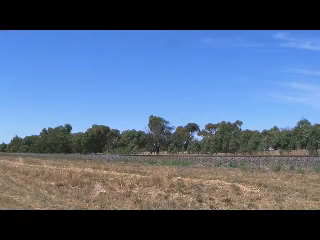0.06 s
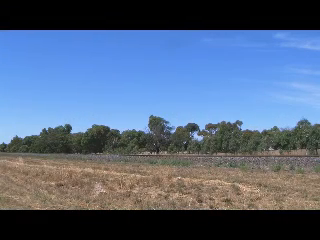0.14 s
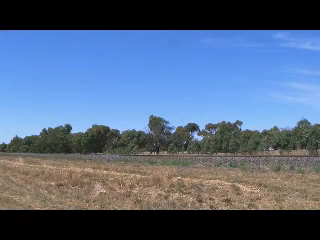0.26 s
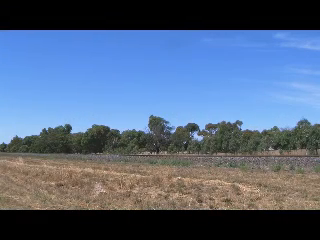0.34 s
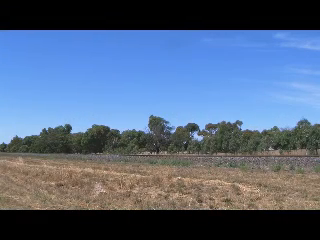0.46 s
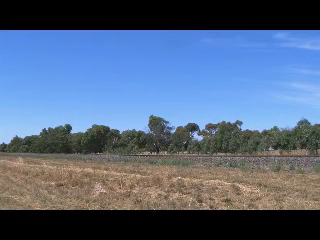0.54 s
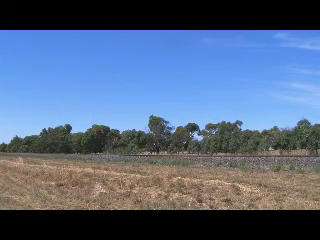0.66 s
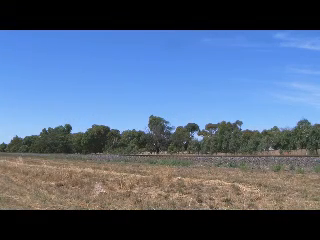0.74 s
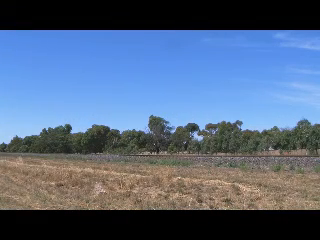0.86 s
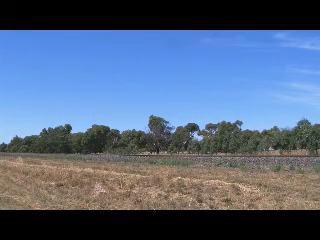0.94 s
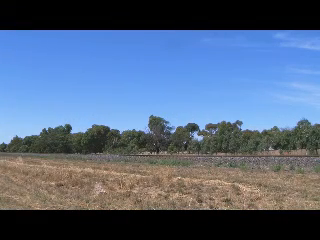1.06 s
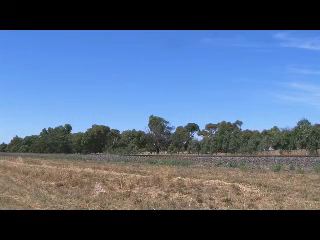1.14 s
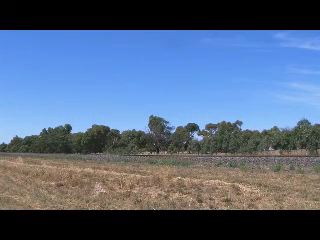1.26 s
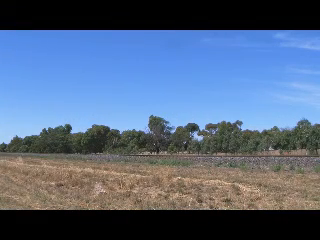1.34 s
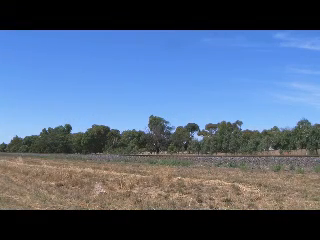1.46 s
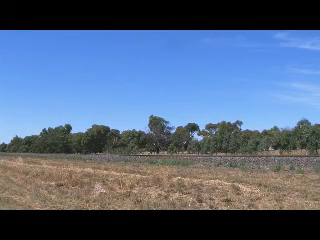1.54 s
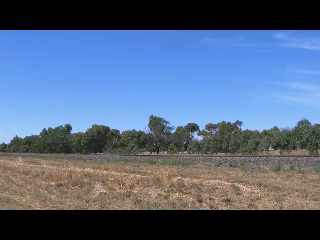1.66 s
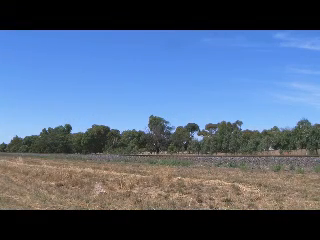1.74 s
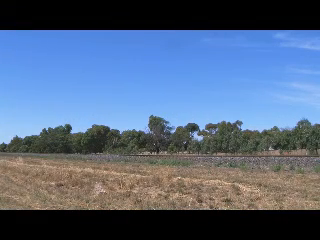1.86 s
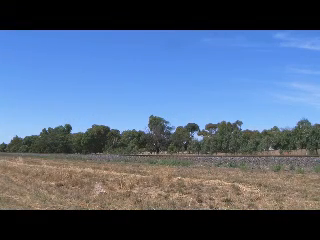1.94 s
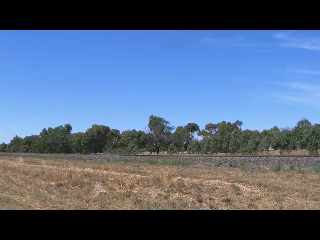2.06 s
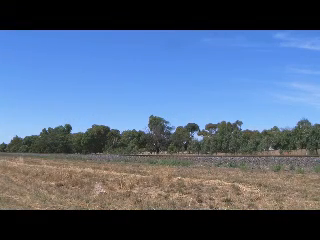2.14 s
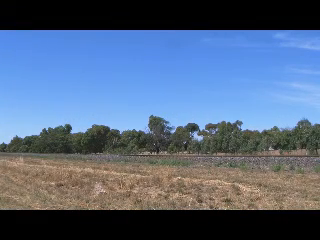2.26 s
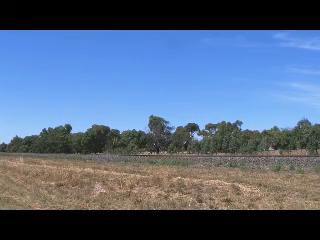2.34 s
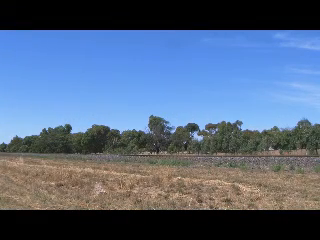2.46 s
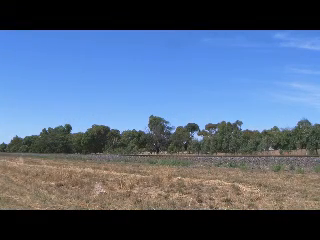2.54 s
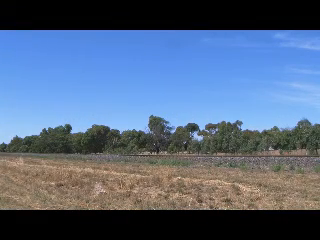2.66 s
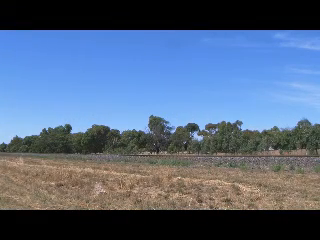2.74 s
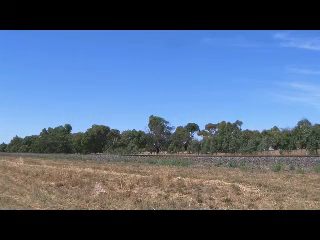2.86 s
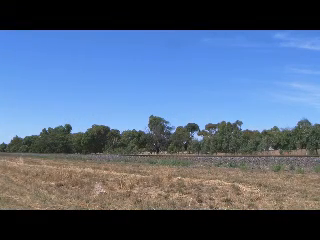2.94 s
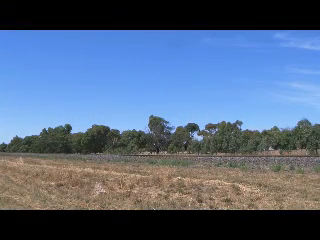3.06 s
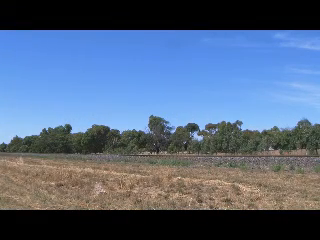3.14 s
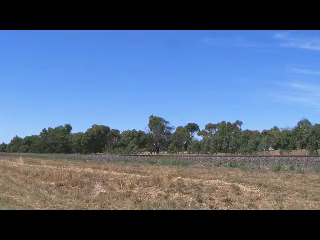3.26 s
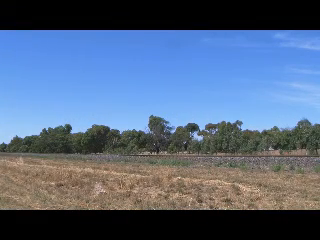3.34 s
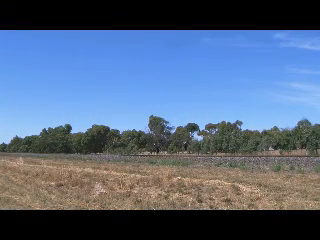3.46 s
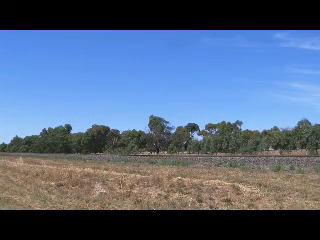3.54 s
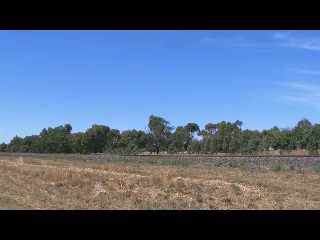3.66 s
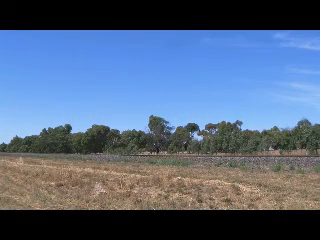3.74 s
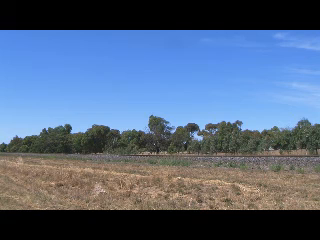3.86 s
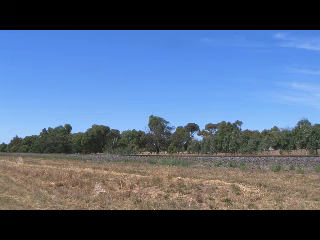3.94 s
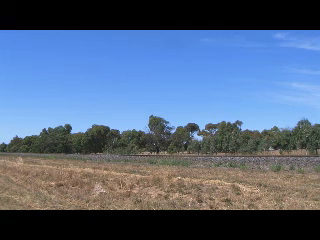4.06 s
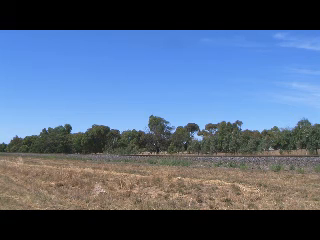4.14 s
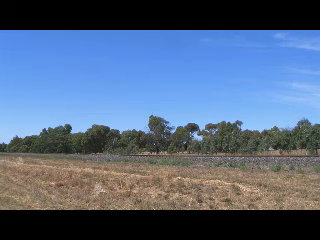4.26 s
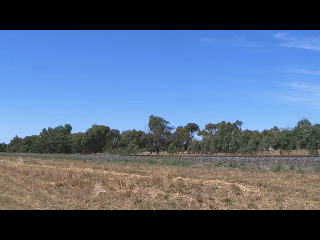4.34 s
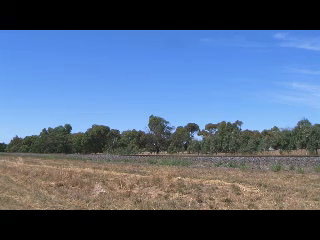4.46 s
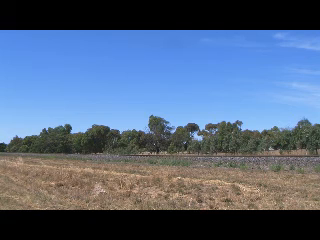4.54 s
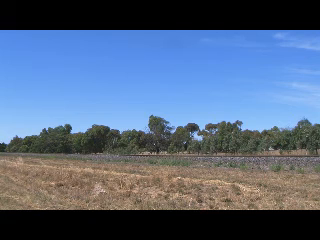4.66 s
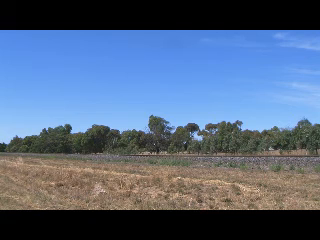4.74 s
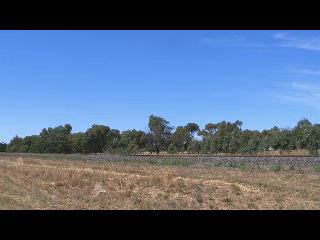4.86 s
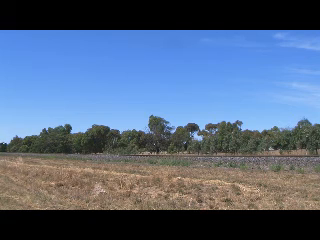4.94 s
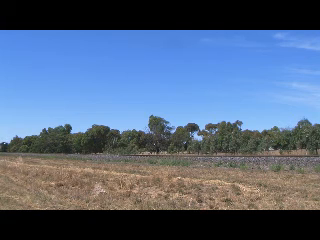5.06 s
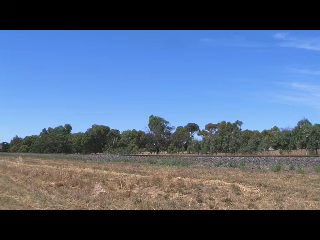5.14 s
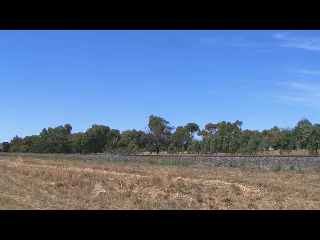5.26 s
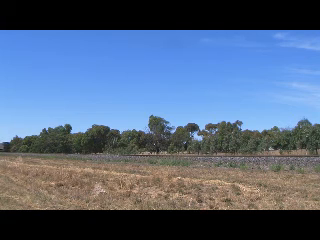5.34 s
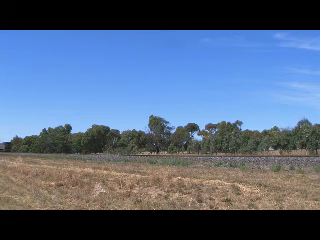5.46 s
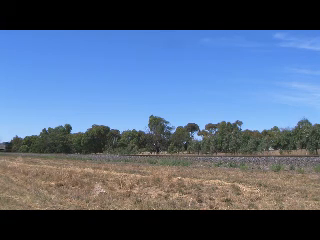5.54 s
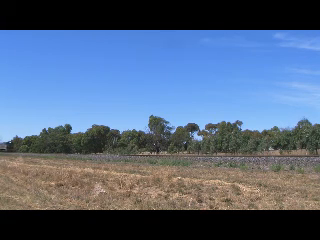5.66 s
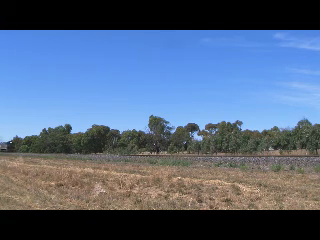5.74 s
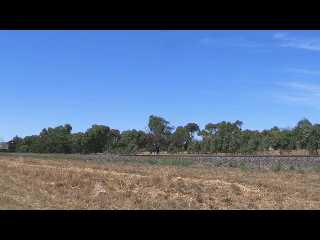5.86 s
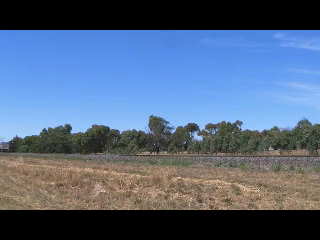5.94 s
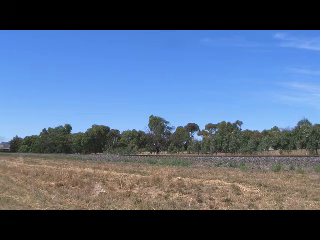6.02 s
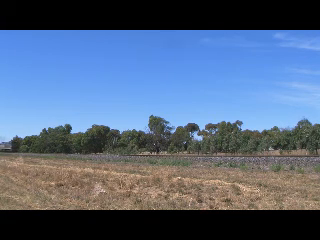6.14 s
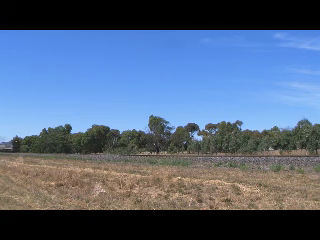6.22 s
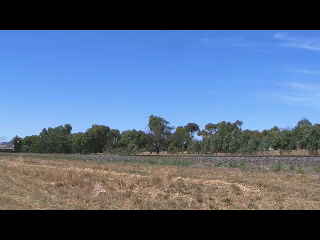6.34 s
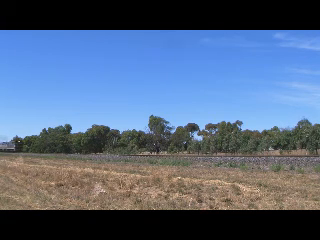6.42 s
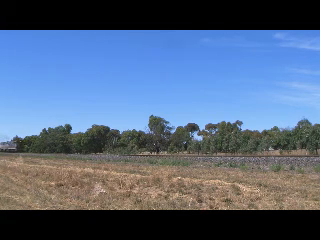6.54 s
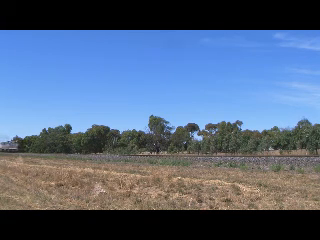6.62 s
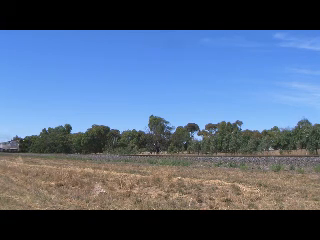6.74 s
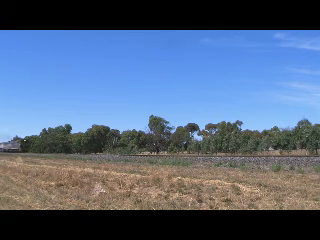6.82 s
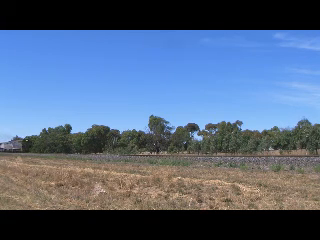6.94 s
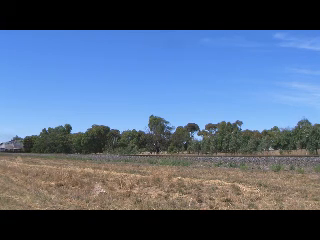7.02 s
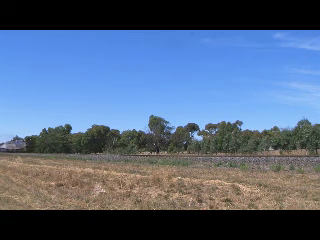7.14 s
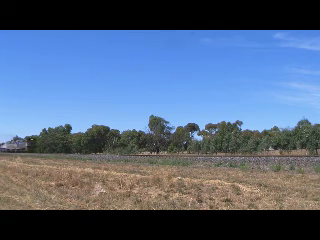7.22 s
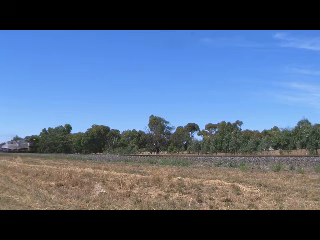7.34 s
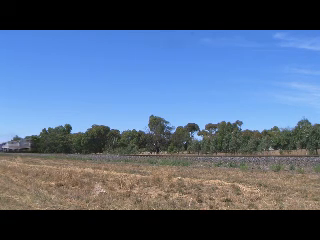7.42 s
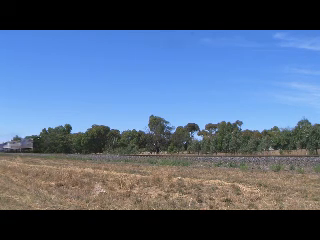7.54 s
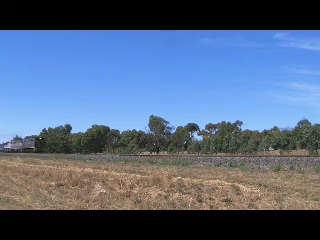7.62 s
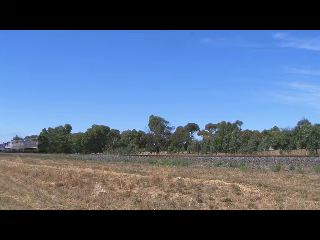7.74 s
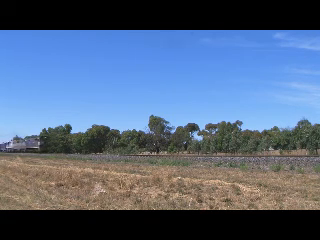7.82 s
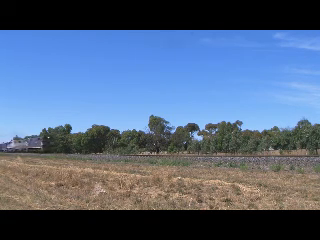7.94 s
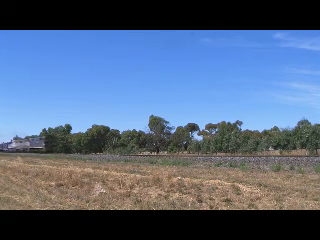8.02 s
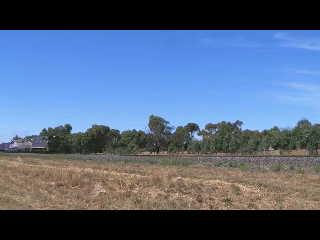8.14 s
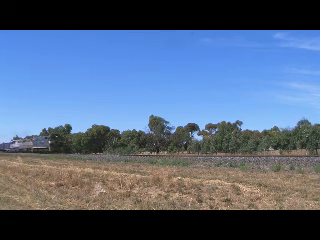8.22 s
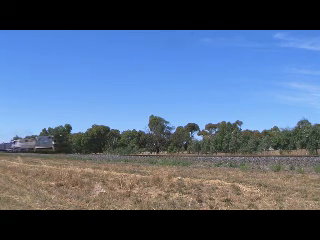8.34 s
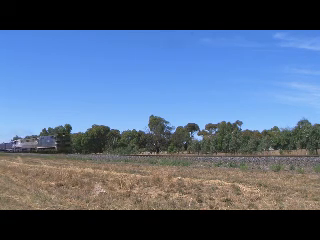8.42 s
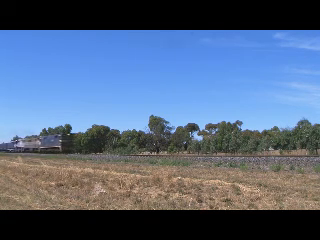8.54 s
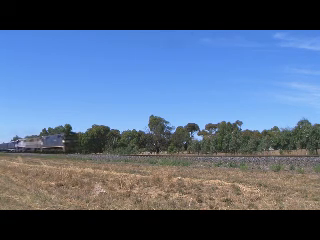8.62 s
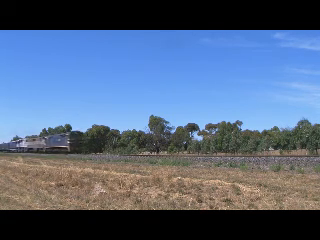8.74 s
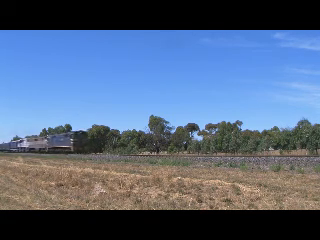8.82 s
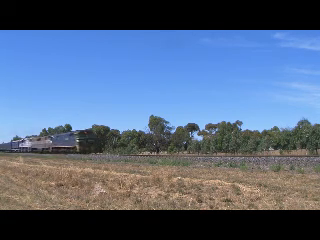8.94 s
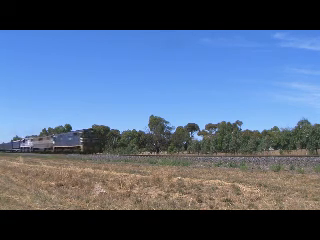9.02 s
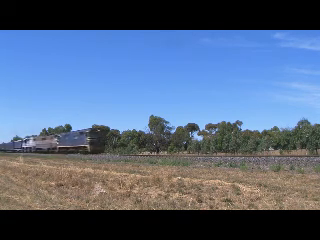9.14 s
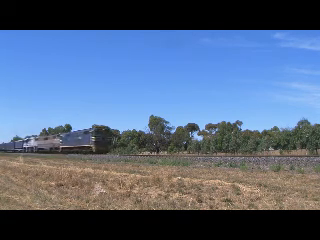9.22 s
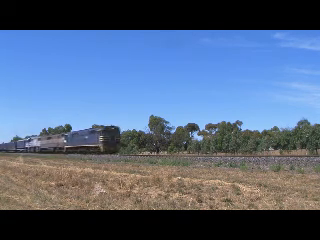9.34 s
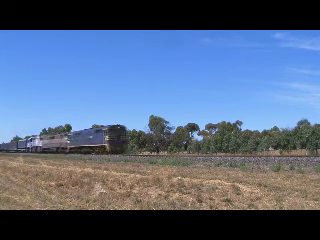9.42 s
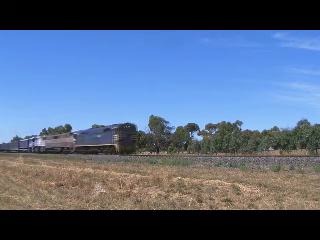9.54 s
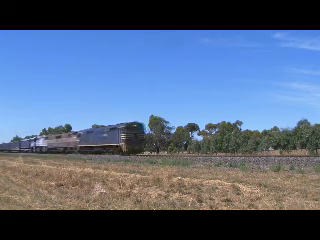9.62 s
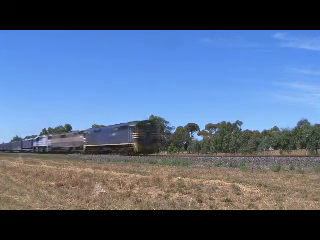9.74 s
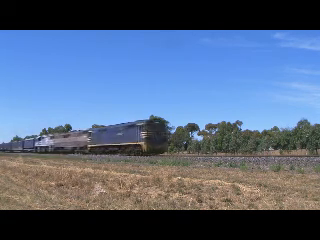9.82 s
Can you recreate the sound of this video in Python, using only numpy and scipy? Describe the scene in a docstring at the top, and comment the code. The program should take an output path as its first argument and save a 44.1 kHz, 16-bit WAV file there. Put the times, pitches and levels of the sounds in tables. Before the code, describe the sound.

A distant diesel locomotive rumbles and whines, toots its horn briefly, then grows loud as it draws close, spitting air.

```python
"""A diesel freight locomotive draws near across open country. At first it is far off: the exhaust chugs
once per shaft turn, a blower whines, wheels roar and clank faintly, and dry grass hisses.
At about 2.7 seconds air blows through the four bells of the horn for one short toot.
Then the train grows louder. In the last second, with the engine close, air spits out in sharp bursts,
the exhaust gives two hard chugs and the roar jumps as the leading wheels draw level."""
import sys
import numpy as np
from scipy import signal
from scipy.fft import rfft, irfft, next_fast_len
from scipy.io import wavfile
from scipy.ndimage import uniform_filter1d, map_coordinates

SR = 44100
rng = np.random.default_rng(int(sys.argv[2]) if len(sys.argv) > 2 else 0)


def log_audio(samples):
    """Write samples as a 16-bit WAV file to the path given in sys.argv[1]."""
    # one column per channel
    frames = np.atleast_2d(samples).T
    # limit to full scale, then quantise
    limited = np.clip(frames, -1, 1)
    pcm = np.round(limited * 32767).astype(np.int16)
    wavfile.write(sys.argv[1], SR, pcm)


N = 436149
T = np.arange(N) / SR


def amp(db):
    return 10 ** (np.asarray(db) / 20)


def unit(x):
    """Scale x to an average power of 1."""
    return x / np.sqrt(np.mean(np.abs(x) ** 2) + 1e-20)


def ramp(x):
    return np.clip(x, 0, 1)


def along(points, hz):
    """Read between (Hz, value) points, spaced by octaves."""
    f, v = np.transpose(points)
    return np.interp(np.log(hz + 1), np.log(f + 1), v)


def curves(rows):
    """One value per sample for each column after the time."""
    times, *columns = np.transpose(rows)
    return [np.interp(T, times, column) for column in columns]


def wobble(rate):
    """A random curve that heads for a new value rate times a second."""
    return map_coordinates(rng.standard_normal(int(N * rate / SR) + 4), [T * rate], order=1)


def filtered(x, response):
    """Scale each frequency in x by response(hz)."""
    size = next_fast_len(N + SR // 4)
    return irfft(rfft(x, size) * response(np.fft.rfftfreq(size, 1 / SR)), size)[..., :N]


def noise(response, patchy_db):
    """Shaped noise of power 1, with random louder and softer patches."""
    cells = signal.stft(rng.standard_normal(N), nperseg=512)[2]
    patches = uniform_filter1d(uniform_filter1d(rng.standard_normal(cells.shape), 4, 0), 12, 1)
    patchy = signal.istft(cells * amp(patchy_db * unit(patches)), nperseg=512)[1][:N]
    return unit(filtered(patchy, response))


def spectrum(points):
    return lambda hz: amp(along(points, hz))


def resonances(rows):
    """A response with one steep peak per row."""
    return lambda hz: np.sqrt(sum(amp(2 * db) / (1 + ((hz - centre) / (width / 2)) ** 2) ** 2
                                  for centre, width, db in rows))


def approach(db, halving_db, loss_db, drift_db):
    """Gain of db at 91.5 m, plus halving_db as the distance halves, less loss_db per extra 100 m."""
    speed_m_s, level_with_us_s, track_m, reference_m = 23.26, 10.12, 16.7, 91.5
    metres = np.hypot(speed_m_s * (level_with_us_s - T), track_m)
    spread_db = halving_db * np.log2(metres / reference_m)
    return amp(db - spread_db - loss_db * (metres - reference_m) / 100 + drift_db * wobble(3))


# The shaft speed we hear sinks as the train turns side-on. Each row: time in seconds, turns per second.
SHAFT_SPEED = [(0, 14.482), (4.5, 14.48), (5, 14.47), (8.3, 14.464), (9.89, 14.41)]
TURNS = np.cumsum(curves(SHAFT_SPEED)[0]) / SR + .008


def chug(depth, late=.33):
    """A swell once per shaft turn, when the strongest cylinders let out their gas."""
    return 1 + depth * np.cos(2 * np.pi * (TURNS - late))


# The exhaust's tones. Each row: multiple of the shaft speed, relative level in dB.
EXHAUST_TONES = [(1, -44), (2, -32.5), (3, -10.5), (4, -9.5), (5, -3), (6, -6), (7, -9), (8, 2), (9, -1.5),
                 (10, -9), (11, -16.5), (12, -15), (13, -13), (14, -10.5), (15, -7), (16, -11.5), (17, -6),
                 (18, -22.5), (19, -10), (20, -14.5), (21, -12), (22, -13), (23, -28.5), (24, -16.5),
                 (25, -14), (26, -12.5), (27, -35), (28, -47.5), (29, -27), (30, -29), (31, -43),
                 (32, -19.5), (33, -25), (34, -18), (35, -20.5), (36, -26), (37, -20.5), (38, -24),
                 (39, -20), (40, -35.5), (41, -22.5), (42, -39), (43, -24), (44, -29), (45, -21),
                 (46, -29.5), (47, -21.5), (48, -30.5)]
# Each pitch range of the chug peaks at its own moment. Each row: frequency in Hz, part of a turn.
CHUG_DELAYS = [(65, .5), (80, .66), (108, .38), (123, .18), (137, .45), (175, .1), (280, .33), (640, .35)]


def tones(first, last, shimmer, rate, scatter=0):
    """Multiples first to last of the shaft speed; swirling air shakes the high ones most."""
    multiple, db = np.transpose(EXHAUST_TONES)
    late = np.cumsum(along(CHUG_DELAYS, (multiple - .5) * SHAFT_SPEED[0][1]))
    out = np.zeros(N)
    for j in range(first - 1, last):
        # uneven cylinders spread the chug over the turn
        angle = 2 * np.pi * (multiple[j] * TURNS - late[j] + late[7] + scatter * rng.standard_normal())
        shake = shimmer * np.sqrt(multiple[j] / 8)
        tone = (1 + shake * wobble(rate)) * np.cos(angle) + shake * wobble(rate) * np.sin(angle)
        out += amp(db[j]) * tone / np.sqrt(1 + shake ** 2)
    return unit(out)


# Rushing exhaust gas. Each row: frequency in Hz, relative level in dB.
GAS_SPECTRUM = [(15, -50), (25, -25), (123, -14), (143, -14.5), (189, -23), (282, -21), (421, -27),
                (639, -25.5), (712, -28.5), (1000, -35.5), (1300, -57), (2200, -120)]
# The ground dulls the exhaust's middle pitches until it is close.
# Each row: time in seconds, level in dB of the lower growl, level in dB of the higher bark.
MIDDLE_LEVELS = [(0, -48.5, -56.5), (1.2, -49.5, -57.5), (1.7, -55, -57), (2.4, -51, -58),
                 (3.2, -50, -55.5), (4.04, -50, -56), (4.6, -46, -54), (5.3, -47, -55.5),
                 (6.03, -44.5, -51), (7.2, -39.5, -52), (7.7, -39.5, -50.5), (8.1, -36, -45.5),
                 (8.46, -28.5, -39), (8.85, -27, -40.5), (9.3, -19.5, -28), (9.55, -20, -24),
                 (9.89, -20.5, -23)]
# Two notes swell and fade in the moving air. Each row: time in seconds, drone in dB, pipe ring in dB.
NOTE_LEVELS = [(0, -49.5, -73), (.61, -52.5, -52), (1, -68, -62), (1.4, -51.5, -59), (1.6, -59, -66),
               (1.9, -50.5, -64), (2.3, -50.5, -68), (2.75, -45.5, -62), (3.2, -73, -52), (3.5, -48, -66.5),
               (3.9, -72, -51.5), (4.25, -69, -67), (4.52, -79, -48.5), (4.85, -54, -66), (5, -44.5, -60),
               (5.15, -57, -52), (5.37, -75, -60), (5.56, -45, -51), (5.85, -47, -60), (6.03, -38.5, -52.5),
               (6.27, -51, -47), (6.35, -54.5, -62), (7.1, -36, -55.5), (7.6, -43, -56), (8.1, -42.5, -59),
               (8.42, -26.5, -36), (8.63, -30.5, -56), (8.85, -40, -34), (9.05, -28.5, -55),
               (9.3, -28, -46), (9.37, -22, -20), (9.56, -22, -24), (9.71, -19, -20), (9.77, -21.5, -27.5),
               (9.89, -21.5, -30)]
# The exhaust pipe's ring. The row: pitch in Hz, width in Hz, relative level in dB.
PIPE_RESONANCE = [(645, 45, 0)]


def exhaust():
    """Puffs of gas make tones and noise in four pitch ranges, and set the exhaust pipe ringing."""
    growl_db, bark_db = curves(MIDDLE_LEVELS)
    drone_db, ring_db = curves(NOTE_LEVELS)
    far = 1 - .049 * T  # sound shimmers more over a long path
    gas = noise(spectrum(GAS_SPECTRUM), patchy_db=2.5) * chug(depth=.017)
    bands_hz = ((0, 105), (105, 185), (185, 410), (410, 1100))
    deep, low, mid, high = (unit(filtered(gas, lambda hz: (hz >= lo) & (hz < hi))) for lo, hi in bands_hz)
    rumble = tones(2, 7, shimmer=.28 * far, rate=2.5) + amp(-8) * deep
    thud = tones(8, 12, shimmer=.18 * far, rate=3) + amp(-12.5) * low
    growl = tones(13, 28, shimmer=.06 + .36 * far, rate=5, scatter=.15) + amp(4 * far - 6) * mid
    bark = tones(29, 48, shimmer=.69 * far, rate=6, scatter=.16)
    bark += amp(5 * far - 4) * high * chug(depth=.34 - .24 * far)
    drone = tones(19, 19, shimmer=.05 + .5 * far, rate=12) * chug(depth=.4)  # the pipe favours this tone
    pipe = tones(44, 44, shimmer=.05 + .6 * far, rate=9) + far * tones(45, 45, shimmer=.4, rate=9)
    pipe += amp(-11) * noise(resonances(PIPE_RESONANCE), patchy_db=1.5)
    ring = unit(pipe * chug(depth=1.2 - 1.1 * far, late=.64 - .45 * far))
    bass = rumble * approach(-34, halving_db=4.5, loss_db=0, drift_db=0)
    bass += thud * approach(-30, halving_db=6, loss_db=1, drift_db=1)
    return bass + amp(growl_db) * growl + amp(drone_db) * drone + amp(bark_db) * bark + amp(ring_db) * ring


def flare_db():
    """The hiss flares up briefly near the end, throbbing with the engine."""
    start_s, rise_s, fall_s = 9.28, .11, .12
    since = T - start_s
    swell = ramp(since / rise_s) * np.exp(-ramp(since - rise_s) / fall_s)
    return swell * (7 + 2 * (chug(depth=.52) - 1))


# Wheels rolling on rails. Each row: frequency in Hz, relative level in dB.
ROAR_SPECTRUM = [(500, -60), (800, 3.5), (1500, -4), (2000, -2.5), (3000, -4.5), (3600, -10.5), (4200, -24),
                 (6000, -43.5), (9000, -54.5)]
# The wheels' ringing notes. Each row: pitch in Hz, width in Hz, relative level in dB.
WHEEL_RESONANCES = [(1134, 100, 3.5), (1206, 70, 6), (1316, 65, 1.5)]
# The blower's fuzzy whine. Each row: pitch in Hz, width in Hz, relative level in dB.
BLOWER_RESONANCES = [(1450, 55, -6.5), (1556, 50, -5), (1530, 200, -9), (1620, 70, -11)]
# The blower beams its sound forward, so it grows little once the train is near.
# Each row: time in seconds, the blower's base level in dB, wheel ring in dB.
BLOWER_AND_WHEEL_LEVELS = [(0, -55.5, -72), (.23, -53.5, -61), (.61, -56.5, -61.5), (1.21, -51, -59.5),
                           (1.51, -53, -60), (1.92, -48.5, -59), (2.4, -51.5, -57.5), (3.3, -52, -59.5),
                           (4.3, -48.5, -54.5), (4.8, -48.5, -58.5), (5.32, -46.5, -52), (5.9, -46.5, -52),
                           (6.35, -41, -48), (7.87, -41.5, -49.5), (8.1, -44, -44.5), (8.6, -41.5, -47),
                           (8.98, -38.5, -44.5), (9.35, -36.5, -36.5), (9.7, -37, -40), (9.78, -30, -30),
                           (9.89, -37.5, -36)]


def wheels_and_blower():
    """Rolling wheels roar and ring, while the blower's blades sing a thin note over a fuzzy whine."""
    blower_db, ring_db = curves(BLOWER_AND_WHEEL_LEVELS)
    jump_db = 3.5 * ramp((T - 9.71) / .07)  # the leading wheels draw level
    roar = noise(spectrum(ROAR_SPECTRUM), patchy_db=.8) * chug(depth=.023)
    roar *= amp(.67 * flare_db() + jump_db)
    ring = amp(ring_db) * noise(resonances(WHEEL_RESONANCES), patchy_db=1.5)
    whine = amp(blower_db - 2) * noise(resonances(BLOWER_RESONANCES), patchy_db=.6)
    blade_hz = 1557 + 13 * wobble(5)
    angle = 2 * np.pi * np.cumsum(blade_hz) / SR
    note = unit((1 + .7 * wobble(38)) * np.cos(angle) + .7 * wobble(38) * np.sin(angle))
    note *= amp(blower_db - 4 - 14 * ramp(T - 8.6))  # fades from 8.6 seconds
    # the loss is below zero because the rails carry the sound ahead
    roar *= approach(-50.5, halving_db=10.6, loss_db=-4.5, drift_db=.5)
    return roar + ring + whine + note


# The horn's bells. Each row: pitch in Hz, base level in dB, start in seconds, stop in seconds.
HORN_BELLS = [(348.8, -38, 2.668, 2.945), (477.7, -34.5, 2.685, 2.95), (603, -31.5, 2.665, 2.945),
              (733.6, -34.5, 2.655, 2.945)]
# Tones early in the toot, one list per bell. Each row: multiple of the pitch, added level in dB.
EARLY_TONES = [
    [(1, 2), (2, -4), (3, -10), (4, -2), (5, -8), (6, -16.5), (7, -26), (8, -16.5), (9, -11.5)],
    [(1, 3.5), (2, -11), (3, -6), (4, -7.5), (5, -16), (6, -21), (7, -10), (8, -29), (9, -39), (10, -29)],
    [(1, 1.5), (2, -9.5), (3, -5), (4, -7.5), (5, -13), (6, -28), (7, -37), (8, -24), (9, -30), (10, -47)],
    [(1, 1), (2, 3.5), (3, -7), (4, -4.5), (5, -9), (6, -18), (7, -24), (8, -44), (9, -43)],
]
# The same columns late in the toot, when the path through the air has shifted.
LATE_TONES = [
    [(1, 0), (2, -14.5), (3, -11.5), (4, -3), (5, -9.5), (6, -16.5), (7, -14.5), (8, -19), (9, -14.5)],
    [(1, 5.5), (2, 9.5), (3, -7.5), (4, 0), (5, -18.5), (6, -24), (7, -7.5), (8, -22), (9, -39), (10, -35)],
    [(1, -1.5), (2, -8.5), (3, -3), (4, -13), (5, -14), (6, -17.5), (7, -39), (8, -35), (9, -35), (10, -48)],
    [(1, 4.5), (2, -5), (3, -3), (4, -8.5), (5, -14), (6, -31), (7, -34), (8, -47), (9, -43)],
]
# Air hissing through the bells. Each row: frequency in Hz, relative level in dB.
BREATH_SPECTRUM = [(400, -30), (1000, -5), (2000, 0), (3300, 0), (4200, -16), (5400, -24), (5700, -40),
                   (7300, -40), (7800, -120)]


def horn():
    """Air sounds four bells; each starts a little high in pitch, settles and sags as it stops."""
    out = np.zeros(N)
    later = ramp((T - 2.72) / .2)
    for (hz, db, start, stop), early, late in zip(HORN_BELLS, EARLY_TONES, LATE_TONES):
        since_stop = ramp(T - stop)
        air = ramp((T - start) / .032 + .5) ** 2 * amp(-60 * since_stop / .1)
        air *= 1 - .35 * ramp((T - stop) / .06 + 1)  # eases just before the stop
        pitch = hz * (1 + .012 * np.exp(-ramp(T - start) / .052) - .0087 * (T > stop))
        angle = 2 * np.pi * np.cumsum(pitch) / SR
        for (k, early_db), (_, late_db) in zip(early, late):
            level_db = db + early_db + (late_db - early_db) * later + (1.6 + .25 * k) * wobble(18)
            jitter = .065 * k * wobble(45) + .045 * k * wobble(260)
            out += air ** (.7 + .2 * k) * amp(level_db) * np.sin(k * angle + jitter)
        leak = ramp((T - start) / .07 + .65) * amp(-60 * since_stop / .24)  # leads and trails the note
        out += leak * amp(db - 17 - 4 * later) * noise(spectrum(BREATH_SPECTRUM), patchy_db=1.5)
    rasp = filtered(out ** 2, lambda hz: hz > 300)  # the loud chord overdrives the air
    return out + 1.6 * rasp


def tree_echo(sound):
    """Far trees send back a soft tail, its pitch blurred by stirring leaves."""
    t = T[:SR]
    tails = rng.standard_normal((2, len(t))) * amp(-60 * t / 1.5) * ramp(t / .06)
    stir = np.cumsum(220 * wobble(50)) / SR
    echoes = signal.fftconvolve(sound[None], tails / np.linalg.norm(tails[0]), axes=1)[:, :N]
    blurred = echoes[0] * np.cos(stir) + echoes[1] * np.sin(stir)
    return amp(-17) * filtered(
        blurred, lambda hz: .7 / (1 + ((hz - 2000) / 1100) ** 2) + 1.3 / (1 + ((hz - 720) / 110) ** 2))


# Faint clanks early on, then two hard exhaust chugs as the engine comes close.
# Each row: start in seconds, relative level in dB.
SHORT_KNOCKS = [(0.562, -48), (0.698, -40), (5.555, -32.5), (8.361, -37), (8.978, -34), (9.352, -25),
                (9.421, -22)]


def knocks():
    """Each knock is a short burst of noise, strongest near 1300 Hz."""
    out, t = np.zeros(N), T[:SR // 10]
    for start, db in SHORT_KNOCKS:
        envelope = amp(db - 60 * t / .11) * (1 - np.exp(-t / .005))
        out[round(start * SR):][:len(t)] += envelope * rng.standard_normal(len(t))
    return amp(15) * filtered(out, lambda hz: 1 / (1 + ((hz - 1300) / 300) ** 2))


# Spits of air. Each row: start in seconds, level in dB that the fade starts from.
AIR_SPITS = [(9.212, -37), (9.3497, -33), (9.385, -32.5), (9.419, -29), (9.4594, -33.5), (9.4878, -31.5),
             (9.56, -32), (9.6004, -33.5), (9.6365, -31.5), (9.6794, -41), (9.6994, -36), (9.763, -36.5)]
# Their bright hiss. Each row: frequency in Hz, relative level in dB.
SPIT_SPECTRUM = [(1500, -30), (2500, 0), (4000, -3), (6000, -9), (9000, -25), (11000, -52)]


def air_spits():
    """Close up, air escapes in sharp bursts as the cylinders empty."""
    rise_s, fade_s = .004, .068
    level = np.zeros(N)
    for start, db in AIR_SPITS:
        t = ramp(T - start)
        level += amp(db - 60 * t / fade_s) * (1 - np.exp(-t / rise_s))
    return level * noise(spectrum(SPIT_SPECTRUM), patchy_db=1.2)


# The hiss of cooling air. Each row: frequency in Hz, relative level in dB.
COOLING_SPECTRUM = [(2500, -39), (4000, 0.5), (6000, -9), (8000, -18.5), (10000, -25.5), (11000, -49.5),
                    (12000, -120)]


def cooling_air():
    """Rushing air pulses with the engine, more deeply as it nears."""
    rush = noise(spectrum(COOLING_SPECTRUM), patchy_db=.8) * chug(depth=.014 * T) * amp(flare_db())
    return rush * approach(-72.5, halving_db=8.5, loss_db=6.7, drift_db=.5)


# The hiss of grass. Each row: frequency in Hz, relative level in dB.
GRASS_SPECTRUM = [(1500, -20), (4000, 0), (7000, -3), (10000, -4), (12700, -6)]
# A dry stalk snaps. The row: start in seconds, level in dB.
STALK_SNAPS = [(1.0832, -47)]


def grass():
    """Dry grass hisses in light gusts, and one stalk snaps."""
    out = amp(-71.8 + .7 * wobble(4)) * noise(spectrum(GRASS_SPECTRUM), patchy_db=.3)
    t = T[:200]
    for start, db in STALK_SNAPS:
        out[round(start * SR):][:len(t)] += amp(db - 60 * t / .0025) * rng.standard_normal(len(t))
    return out


def scene():
    """The train, its horn and the grass in one channel."""
    train = exhaust() + wheels_and_blower() + cooling_air() + air_spits() + knocks()
    toot = horn()
    return (train + toot + tree_echo(toot) + grass())[None]


def record(dry):
    """Round off the tallest peaks, thin the deepest bass and cut the highest treble."""
    ceiling, bass_hz, top_hz = .95, 36, 12750
    rounded = dry / (1 + np.abs(dry / ceiling) ** 6) ** (1 / 6)
    return filtered(rounded, lambda hz: (hz < top_hz) / np.sqrt(1 + (bass_hz / (hz + 1)) ** 6))


dry = scene()
out = record(dry)
log_audio(out)
```